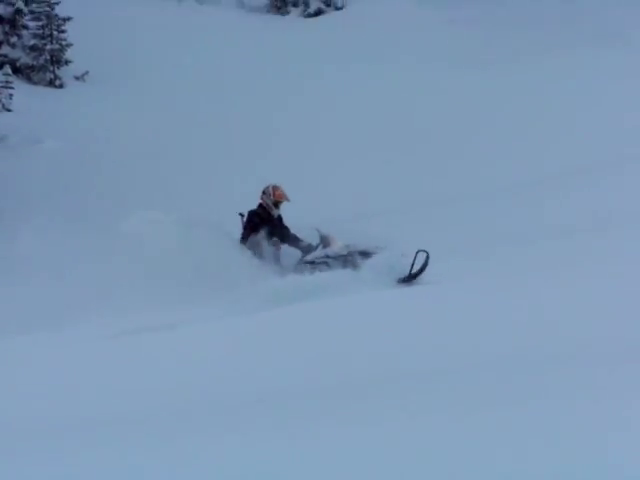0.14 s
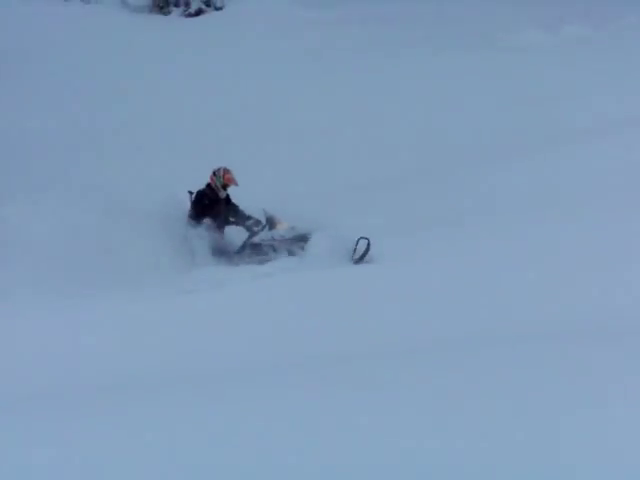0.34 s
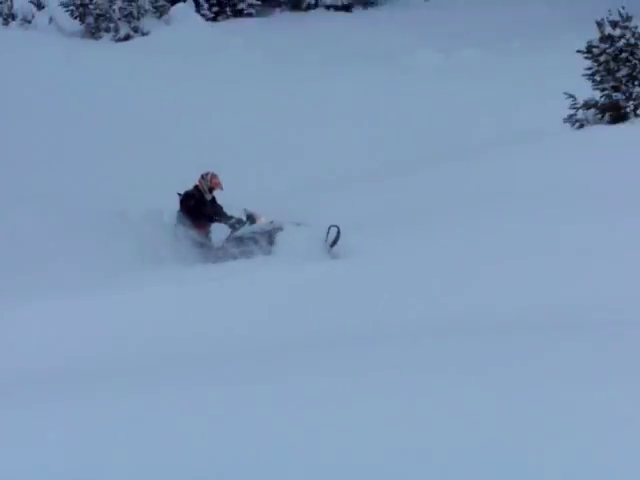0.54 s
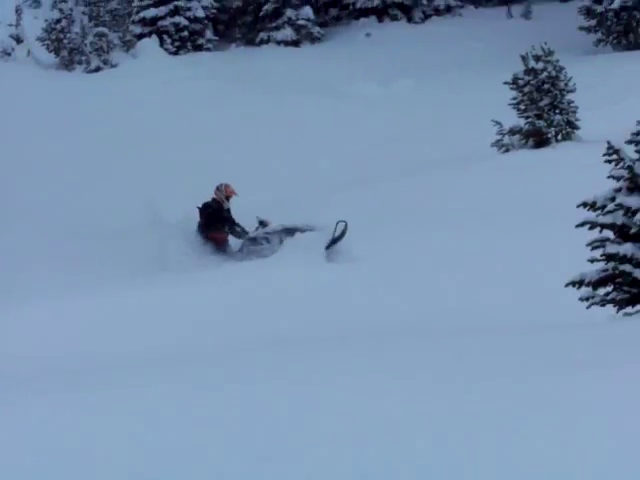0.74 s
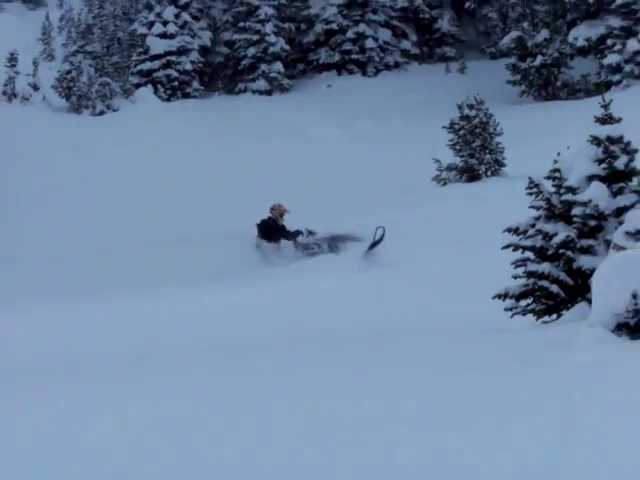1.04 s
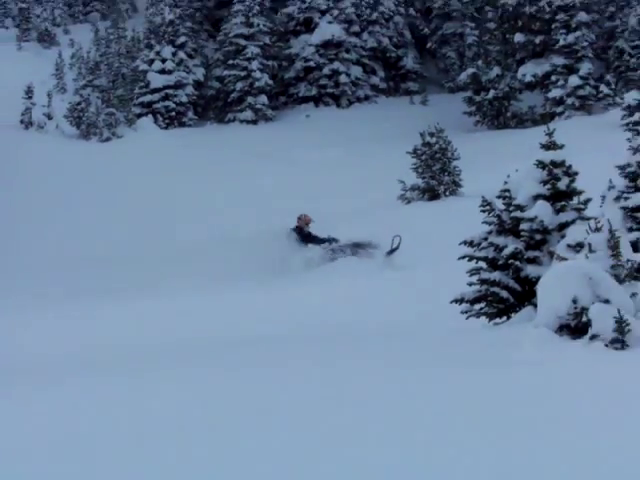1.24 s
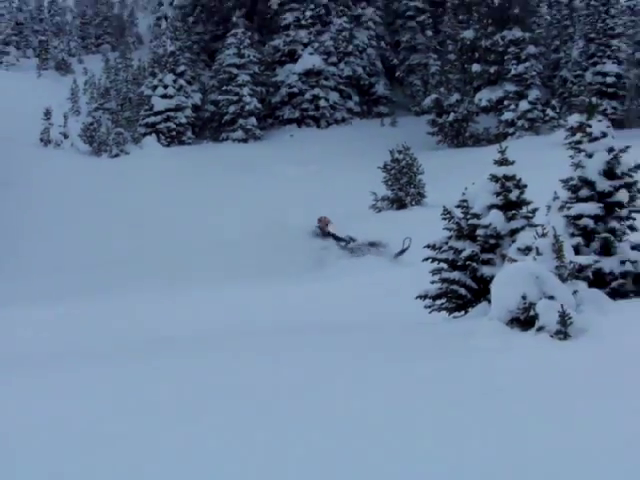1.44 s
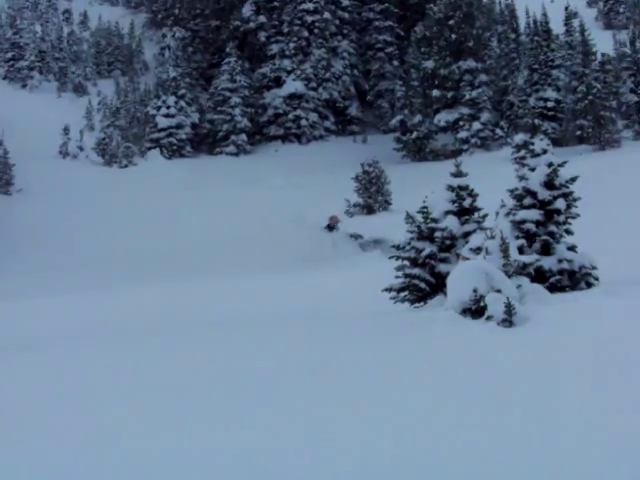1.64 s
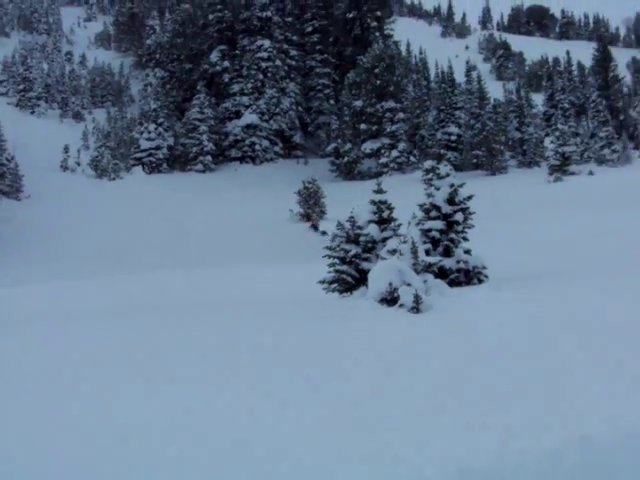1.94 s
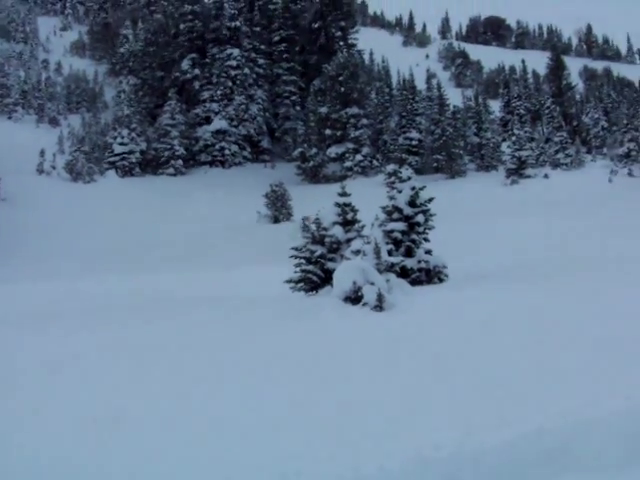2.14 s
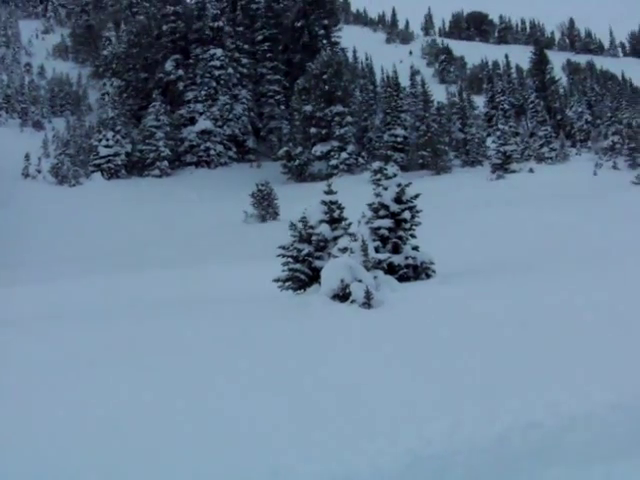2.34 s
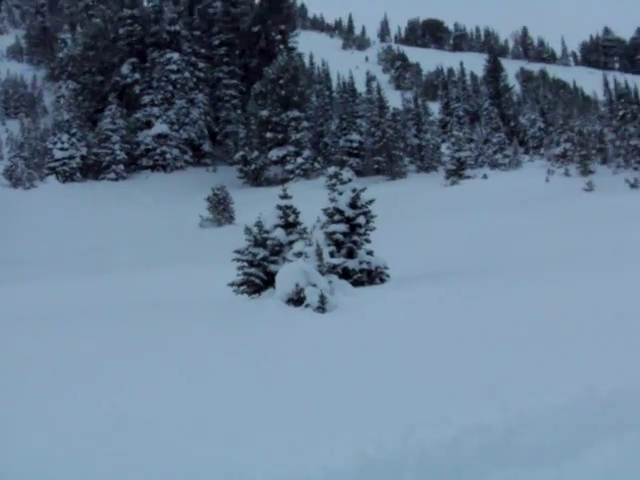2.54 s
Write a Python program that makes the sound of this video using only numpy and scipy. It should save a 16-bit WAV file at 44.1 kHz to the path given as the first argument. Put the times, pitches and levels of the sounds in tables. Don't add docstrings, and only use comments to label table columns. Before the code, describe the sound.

Raspy snowmobile engine outdoors in deep snow, briefly sagging before surging loud and holding a nearly steady buzzing pitch, then growing distant; dull forest wash, slight wind bumps, and a click on the camera body near the end.

```python
import sys
import numpy as np
from scipy import signal
from scipy.fft import rfft, irfft
from scipy.io import wavfile

SR = 44100
rng = np.random.default_rng(int(sys.argv[2]) if len(sys.argv) > 2 else 0)


def output_pcm(signal):
    pcm = np.clip(np.atleast_2d(signal).T, -1, 1) * 32767
    wavfile.write(sys.argv[1], SR, np.round(pcm).astype(np.int16))


def volts_from_db(level):
    exponent = np.asarray(level, float) / 20
    return 10 ** exponent


N = 119070
TIME = np.arange(N) / SR
SPARSE = 40
LEFT_RIGHT = np.array([[0.5], [-0.5]])


def in_time(rows):
    t, *columns = np.transpose(rows)
    return [np.interp(TIME, t, column) for column in columns]


def at_hz(points, hz):
    p = np.array(points, float)
    return np.interp(np.log(hz), np.log(np.maximum(p[:, 0], 10)), p[:, 1])


def sparse_drift(rate_hz):
    r = np.exp(-2 * np.pi * rate_hz * SPARSE / SR)
    settle = 2000
    noise = rng.standard_normal(N // SPARSE + 2 + settle)
    slow = signal.lfilter([1], [1, -2 * r, r * r], noise)[settle:]
    slow = slow - slow.mean()
    return slow / np.sqrt(np.mean(slow ** 2) + 1e-20)


def fill(sparse):
    return np.interp(np.arange(N) / SPARSE, np.arange(len(sparse)), sparse)


def drift(rate_hz):
    return fill(sparse_drift(rate_hz))


def bands(spectrum, edges, alike_at, patchy_db, dull=0.):
    knee_hz = 1600
    out, power, white = 0, 0, rng.standard_normal((2, 2, N))
    for k, (low, high) in enumerate(zip(edges, edges[1:])):
        band_pass = signal.butter(2, [low, high], "band", fs=SR, output="sos")
        mid, side = signal.sosfilt(band_pass, white[k % 2])
        hz = np.sqrt(low * high)
        alike = np.clip(alike_at(hz), 0, 1)
        pair = np.sqrt(1 + alike) * mid + np.sqrt(1 - alike) * side * [[1], [-1]]
        band = volts_from_db(at_hz(spectrum, hz) + patchy_db * drift(3.2)) * pair
        power += np.mean(band ** 2)
        octaves_above = max(np.log2(hz / knee_hz), 0)
        out = out + band * volts_from_db(-dull * octaves_above)
    return out / np.sqrt(power)


# f/Hz, level/dB per Hz
FOREST_WASH = [(250, -45), (400, -6), (800, 1.5), (1400, 3.5), (2500, -35)]


def forest():
    return volts_from_db(-33.5) * bands(FOREST_WASH, 250 * 2 ** np.arange(0, 3.6, .5), lambda hz: .9, 1.4)


# f/Hz, level/dB per Hz
WIND_RUMBLE = [(12, -42), (20, -2.5), (81, -2), (166, -4.5), (245, -3.5), (292, -31.5), (400, -6),
               (520, -36), (880, -120)]
# t/s, peak level/dB, f/Hz, length/s
WIND_BUMPS = [
    (0.276, -33, 85.16, 0.0082),
    (0.648, -46, 86.6, 0.042),
    (1.06, -45, 69.55, 0.011),
    (1.161, -45, 63.3, 0.061),
    (1.406, -45, 49.38, 0.04),
    (1.876, -43, 59.7, 0.029),
    (2.238, -44.5, 73.53, 0.024),
]


def wind():
    level_db, lumps_db, alike, left_right_db = -50, 1.8, 0.38, -11
    rumble = bands(WIND_RUMBLE, 20 * 2 ** np.arange(0, 4.4, .5), lambda hz: alike, 0.65)
    out = volts_from_db(level_db + lumps_db * drift(5.4)) * rumble
    for s, db, hz, length_s in WIND_BUMPS:
        t = TIME - s
        out = out + volts_from_db(db) * np.exp(-(t / length_s) ** 2) * np.cos(2 * np.pi * hz * t)
    return out * volts_from_db(left_right_db * LEFT_RIGHT)


# t/s, peak level/dB
BODY_TICK = [
    (2.5863, -1),
]
# f/Hz, level/dB, t60/s, left-right/dB, right lag/rad
SHELL_MODES = [(1130, -20, 0.016, -20.5, 0.79), (1720, -0.5, 0.0095, 6.5, 1.7), (2600, 1, 0.01, 7.5, 1.9),
               (3000, -6, 0.014, -7, 1.5), (4630, -2, 0.0093, -6, 1.7), (6770, -4, 0.0054, -1, 1.9)]


def tick():
    rise_s, low_cut_hz = 0.00017, 500
    out = np.zeros((2, N))
    for s, db in BODY_TICK:
        t = np.maximum(TIME - s, 0)
        rise = 1 - np.exp(-(t / rise_s) ** 2)
        for hz, level_db, t60, pan_db, lag in SHELL_MODES:
            ring = rise * volts_from_db(db + level_db - 60 * np.minimum(t / t60, 5))
            phase = 2 * np.pi * hz * t - np.array([[0], [lag]])
            out += ring * volts_from_db(pan_db * LEFT_RIGHT) * np.sin(phase)
    return signal.sosfilt(signal.butter(2, low_cut_hz, "high", fs=SR, output="sos"), out)


# f/Hz, level/dB per Hz
GAS_HISS = [(150, -38), (250, -42), (305, -40), (992, -20.5), (1480, -1), (3880, -2), (6730, -14),
            (7500, -16.5), (8900, -17.5), (9900, -30), (12600, -67)]
# f/Hz, likeness (0 to 1)
HISS_LIKENESS = [(300, 0.42), (1200, 0.93), (3000, 0.76), (9000, 1)]


def puffing_hiss(turns, dull):
    edges = 260 * 2 ** np.arange(0, 5.4, 1 / 3)
    hiss = bands(GAS_HISS, edges, lambda hz: at_hz(HISS_LIKENESS, hz), 0.8, dull)
    each_firing = 0.45 * np.cos(4 * np.pi * turns)
    each_turn = 0.15 * np.cos(2 * np.pi * turns)
    return hiss * (1 + each_firing + each_turn)


# multiple of firing rate, level/dB
FROM_FRONT = [(1, -15), (2, -18), (3, -15), (4, 1), (5, -6), (6, 1), (7, -3), (8, -5), (9, -6), (10, 0),
              (11, -2), (12, -5), (13, -4), (14, -3), (15, 0), (16, 0), (17, 0), (18, -2), (19, -8),
              (20, -9), (21, -11), (22, -13), (23, -17), (24, -16), (26, -20), (28, -24), (30, -25),
              (36, -34)]
FROM_FRONT_QUARTER = [(1, -24.5), (2, -16.5), (3, -12.0), (4, -15), (5, -8.5), (6, -4.0), (7, -16.5),
                      (8, -9.5), (9, -6.5), (10, -4.5), (11, -2.5), (12, 4.5), (13, -4), (14, 6), (15, 4),
                      (16, 4), (17, -2.5), (18, -5), (19, -13.5), (20, 0), (21, -13.5), (22, -13.5),
                      (23, -10.5), (24, -18), (25, -20.5), (26, -20.0), (27, -25), (28, -15), (29, -17.5),
                      (30, -25.5), (31, -40), (32, -56.5), (33, -53), (34, -43), (35, -49.0), (36, -63)]
FROM_SIDE = [(1, -20.5), (2, -22.5), (3, -2.5), (4, -16), (5, -14.5), (6, 1), (7, -1.5), (8, -15.5),
             (9, -0.0), (10, -14), (11, -9.5), (12, -1), (13, 2.0), (14, 4.5), (15, -1.5), (16, 1),
             (17, -14), (18, -3.0), (19, -3), (20, -16), (21, 0.5), (22, -6), (23, -20), (24, -6),
             (25, -9.5), (26, -5.5), (27, -5.5), (28, -20.5), (29, -16.5), (30, -34.5), (31, -50.5),
             (32, -41), (33, -51.5), (34, -51), (35, -41), (36, -38)]
FROM_REAR_QUARTER = [(1, -17.5), (2, -23.5), (3, -6), (4, -6.0), (5, -10), (6, -7.5), (7, -4.5), (8, -10.5),
                     (9, -2), (10, -11.5), (11, -1.5), (12, 5.0), (13, 2), (14, 1.0), (15, -0.5), (16, 2.5),
                     (17, -2.5), (18, -9.5), (19, -8.5), (20, -10.5), (21, -15.5), (22, -19), (23, -13.5),
                     (24, -10), (25, -9.5), (26, -20.5), (27, -13), (28, -11.5), (29, -17.0), (30, -22),
                     (31, -36), (32, -45), (33, -40), (34, -37), (35, -20), (36, -39)]
FROM_BEHIND = [(1, -18.0), (2, -15.5), (3, -16), (4, -7.5), (5, -6), (6, -2), (7, -3), (8, -7), (9, 1),
               (10, -6), (11, 9), (12, 3.5), (13, 2.5), (14, 10.5), (15, 4), (16, 1.5), (17, -3.5),
               (18, -10.5), (19, 1.5), (20, -12), (21, -7.5), (22, -13.5), (23, -19), (24, -8), (25, -11.0),
               (26, -7), (27, -3), (28, -20.5), (29, -5.5), (30, -40), (31, -33), (32, -52), (33, -55),
               (34, -45), (35, -15.5), (36, -27)]
BEHIND_TREES = [(1, -10.5), (2, -13.5), (3, 0), (4, -4.5), (5, 4), (6, 1.0), (7, -8.5), (8, -7.5), (9, -11),
                (10, -2.5), (11, 0.5), (12, -3.5), (13, 2), (14, -10.0), (15, 2.5), (16, -4.5), (17, 1),
                (18, -6.5), (19, 2.5), (20, -11.0), (21, -11.5), (22, -11.5), (23, -15), (24, -21),
                (25, -15), (26, -10.5), (27, -32.5), (28, -10.5), (29, -33.5), (30, -23.5), (31, -44.5),
                (32, -50.0), (33, -52.0), (34, -58), (35, -50), (36, -51.0)]
HALF_ORDERS = (-17, -14.5, -13.5, -12, -12, -4)


def exhaust(turns, fire_hz, bearing, hiss_share):
    top_order, full_speed_hz = 37, 250.2
    peak_hz, peak_octaves, peak_db = 1730, 1, 3.5
    pipe_fills_s, pipe_below_hz = 0.091, 220
    waver_db, waver_hz, steady_below_hz = 1.4, 7, 440
    rough_db, rough_rad, rough_hz = 22.5, 2.76, 54
    rough_above_hz, buried_db = 2940, 12
    smear_rad, tight_below_hz, drift_rad = 2.0, 2000, 0.55
    port_waver_db = 1.5

    faces = [np.transpose(rows) for rows in (
        FROM_FRONT, FROM_FRONT_QUARTER, FROM_SIDE, FROM_REAR_QUARTER, FROM_BEHIND, BEHIND_TREES)]
    every = np.minimum(SPARSE * np.arange(N // SPARSE + 2), N - 1)
    rate, bearing, rough = fire_hz[every], bearing[every], hiss_share[every] ** 2.53
    unfilled = 1 / (1 + np.exp((every / SR - pipe_fills_s) / 0.0085))
    out, power = np.zeros((2, N)), 0
    for order in range(2, 2 * top_order - 1):
        multiple, half = order / 2, order % 2
        hz = rate * multiple
        levels = [np.interp(multiple, *face) + half_db * half for face, half_db in zip(faces, HALF_ORDERS)]
        db = np.interp(bearing, np.arange(len(faces)), levels)
        db += half * peak_db * np.exp(-(np.log2(hz / peak_hz) / peak_octaves) ** 2)
        power = power + volts_from_db(db) ** 2 / 2
        db -= 18 * unfilled * (hz < pipe_below_hz)

        usual_hz = multiple * full_speed_hz
        unsteady = min(usual_hz / steady_below_hz, 1)
        broken = rough * np.minimum(hz / rough_above_hz, 1) ** 2
        db += unsteady * waver_db * sparse_drift(waver_hz)
        db += broken * (rough_db * sparse_drift(rough_hz) - buried_db)
        pan_db = port_waver_db * unsteady * sparse_drift(0.55)

        smear = smear_rad * min(usual_hz / tight_below_hz, 1)
        lag = unsteady * (smear * rng.standard_normal() + drift_rad * sparse_drift(2.3))
        lag = lag + rough_rad * broken * sparse_drift(rough_hz)
        swell = np.array([fill(volts_from_db(db + pan_db)), fill(volts_from_db(db - pan_db))])
        out += swell * np.cos(2 * np.pi * order * turns + fill(lag))
    return out / fill(np.sqrt(power))


# t/s, firing f/Hz, level/dB, hiss share/dB, hiss dullness/dB per octave above the knee,
# bearing (0 front, 1 front quarter, 2 side, 3 rear quarter, 4 behind, 5 behind trees)
SLED_RUN = [(0, 205.4, -17.5, 0.5, -4, 4.5), (.02, 201.8, -25.5, -12.5, -10, -1),
            (.04, 197.8, -21, -2.5, -4, 0.5), (.075, 184, -24, -2, 0, -2),
            (.09, 184.3, -16.5, -3.5, -2, 0.5), (.16, 192, -20.5, -2.5, -2, 0),
            (.3, 219.3, -13.5, -5.5, 1, 0.24), (.36, 231.3, -15.5, -6, -1, 0.34),
            (.49, 246.2, -9, -8.5, 0, 1), (.59, 256, -9, -9.5, -2, 1.13), (.87, 252.5, -12.5, -8, -4, 1.8),
            (1.12, 249.2, -11.5, -11, -3.5, 3), (1.33, 247.5, -13.5, -8, -2.5, 2.5),
            (1.6, 250.8, -11.5, -8.5, -2.5, 3), (1.8, 249.1, -14, -8.5, -4, 4),
            (2.2, 253.7, -18, -9, -1.5, 4.5), (2.42, 250.8, -22.5, -6.5, 0, 5),
            (2.7, 252.1, -27, -10, -4.5, 18)]


def engine():
    jitter_s, jitter_hz, hiss_trim_db = 0.000012, 12, -2.5
    fire_hz, level_db, hiss_db, dull, bearing = in_time(SLED_RUN)
    crank_hz = fire_hz / 2
    turns = np.cumsum(crank_hz) / SR + jitter_s * drift(jitter_hz) * crank_hz
    share = np.minimum(volts_from_db(hiss_db), 1)
    tones = np.sqrt(1 - share ** 2) * exhaust(turns, fire_hz, bearing, share)
    hiss = volts_from_db(hiss_trim_db) * share * puffing_hiss(turns, dull)
    return volts_from_db(level_db) * (tones + hiss)


# f/Hz, left-right level/dB
PORT_GAIN = [(250, -1), (610, -3), (1330, -6), (1970, -7), (2900, 6), (4270, -7.5), (6290, -6.5),
             (9270, -2.5)]
# f/Hz, left lead/rad
PORT_LEAD = [(430, -0.25), (1720, 0.54), (1980, 0.42), (2580, 0.8), (3450, -0.65), (5000, 0.62),
             (7240, 0.58), (8790, 0.43)]


def ports(x):
    dip_hz, dip_width_hz, dip_db = 8150, 600, -11
    hz = np.maximum(np.fft.rfftfreq(N, 1 / SR), 10)
    dip = dip_db * np.exp(-((hz - dip_hz) / dip_width_hz) ** 2)
    gain = volts_from_db(LEFT_RIGHT * at_hz(PORT_GAIN, hz) + dip)
    lead = np.exp(1j * LEFT_RIGHT * at_hz(PORT_LEAD, hz))
    return irfft(rfft(x) * gain * lead, N)


def scene():
    distant = forest() + engine()
    return ports(distant) + wind() + tick()


def roll_off(x):
    return signal.sosfilt(signal.butter(12, 9870, fs=SR, output="sos"), x)


def record(dry):
    ceiling, cutoff_hz = 1.8, 9850
    rounded = ceiling * np.tanh(dry / ceiling)
    top_cut = signal.cheby2(12, 60, cutoff_hz + 500, fs=SR, output="sos")
    mix = signal.sosfilt(top_cut, rounded)
    return roll_off(mix)


dry = scene()
out = record(dry)
output_pcm(out)
```